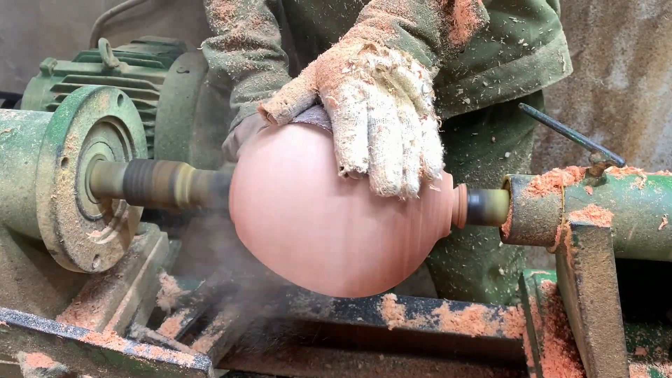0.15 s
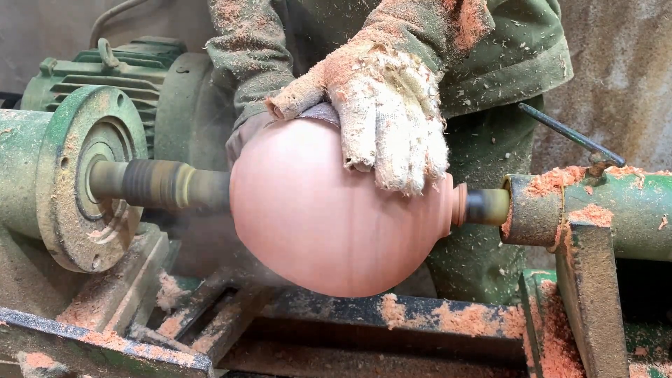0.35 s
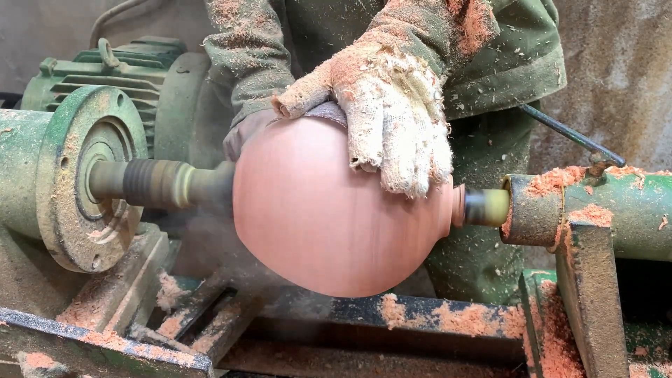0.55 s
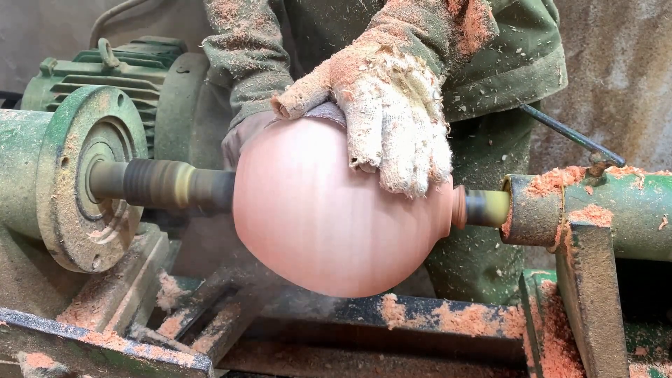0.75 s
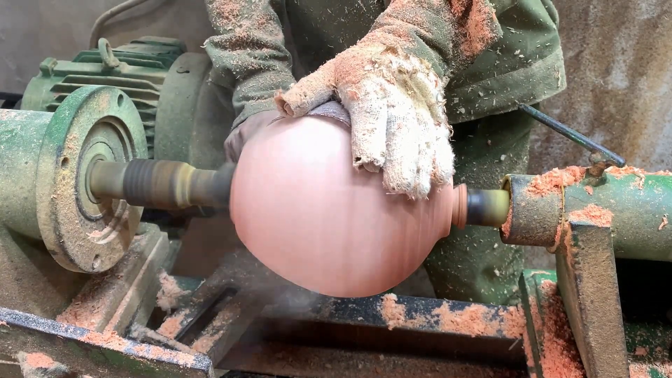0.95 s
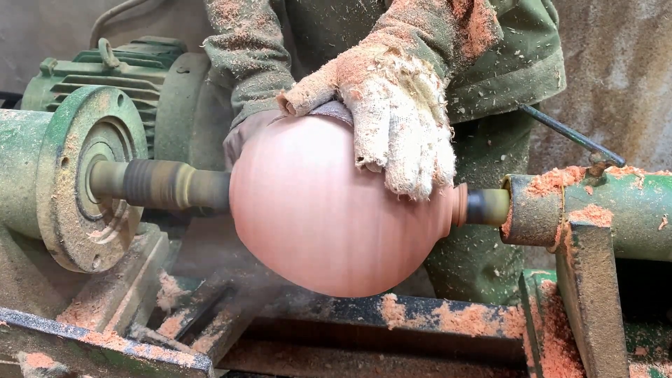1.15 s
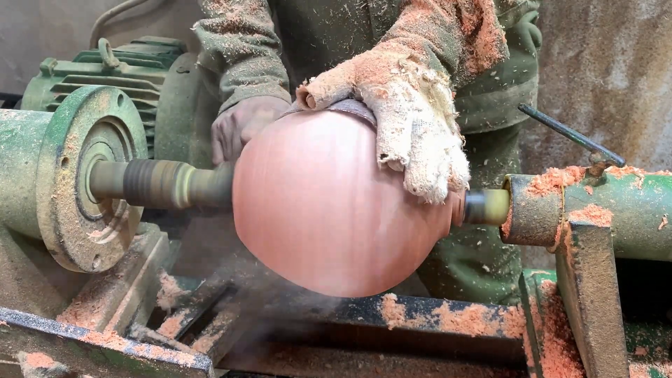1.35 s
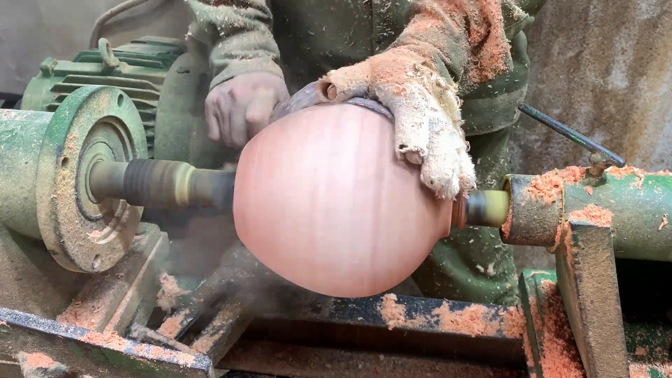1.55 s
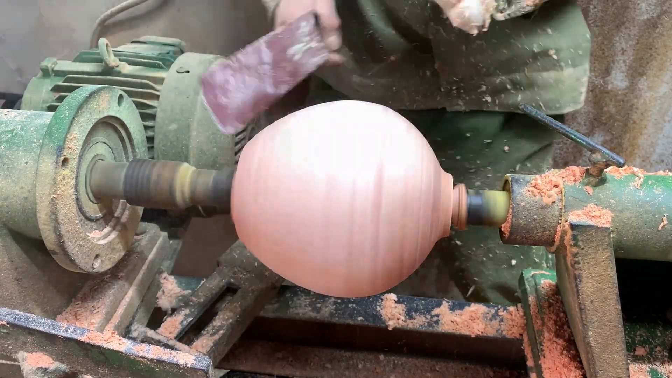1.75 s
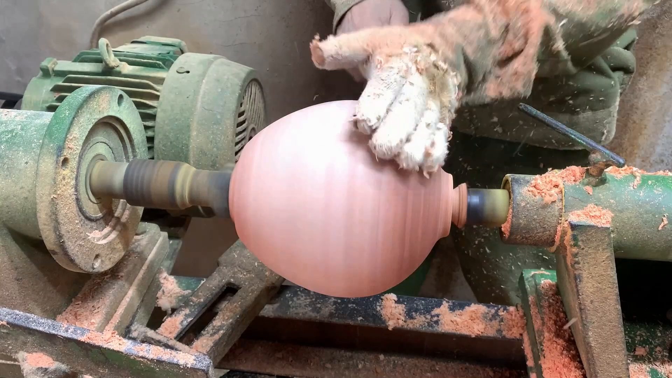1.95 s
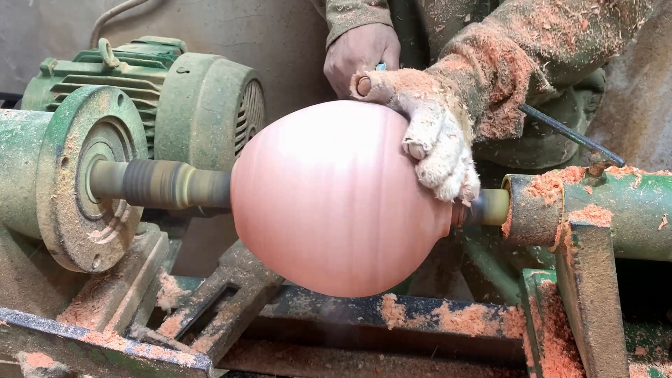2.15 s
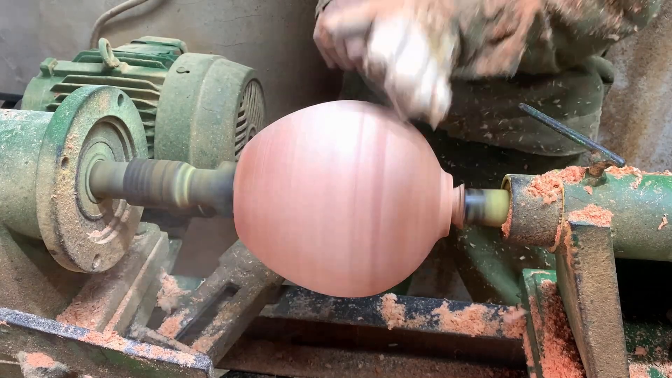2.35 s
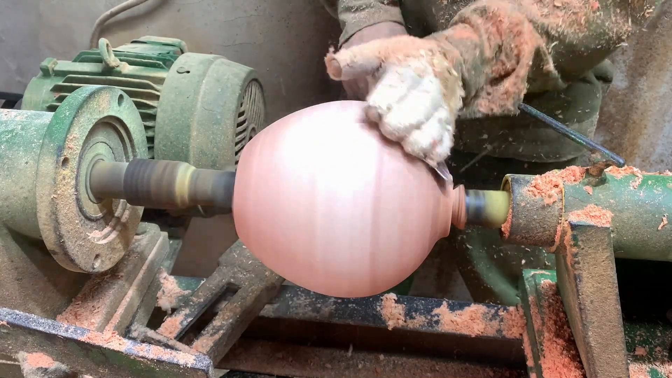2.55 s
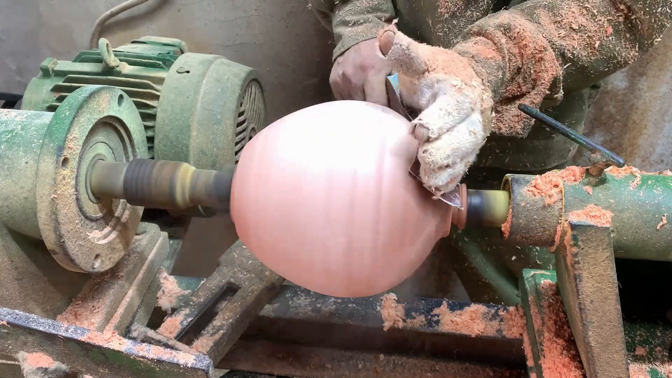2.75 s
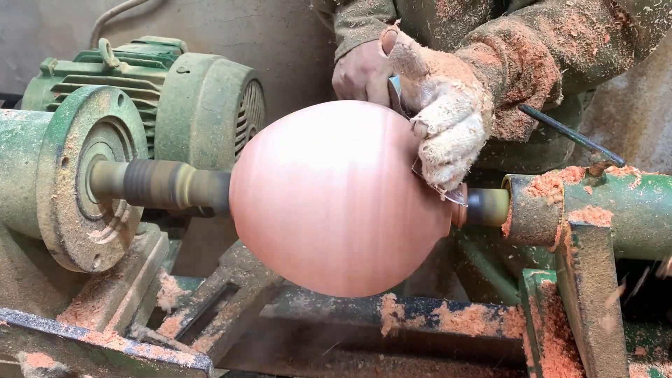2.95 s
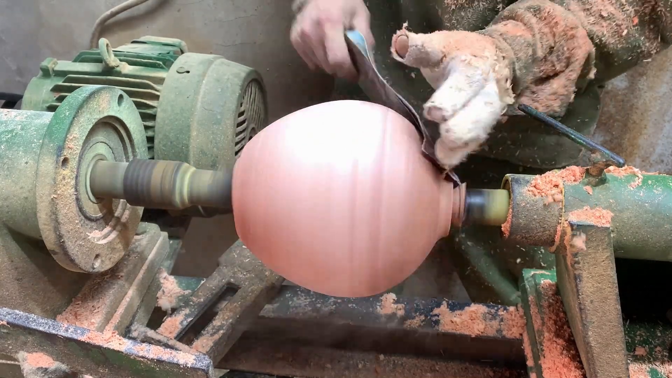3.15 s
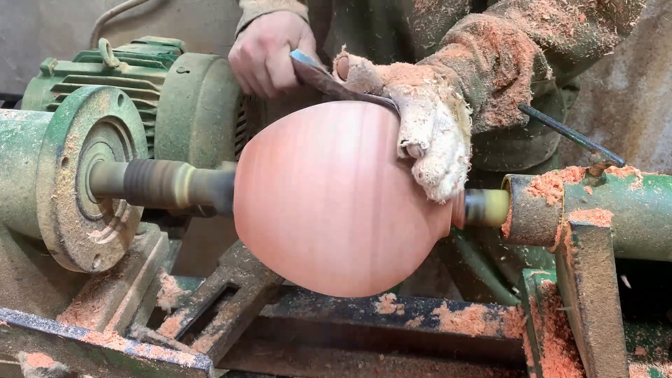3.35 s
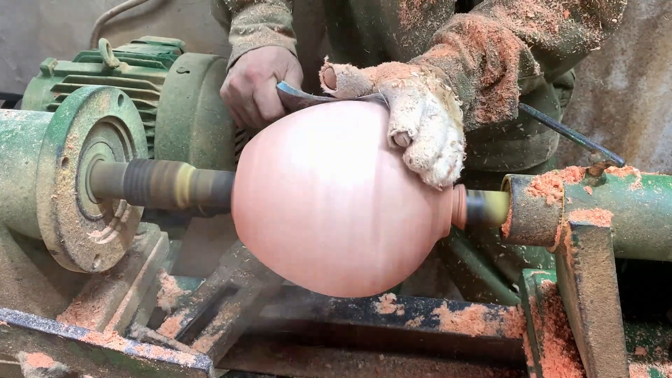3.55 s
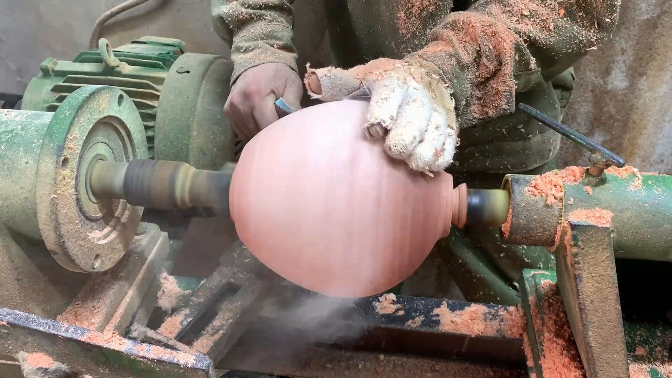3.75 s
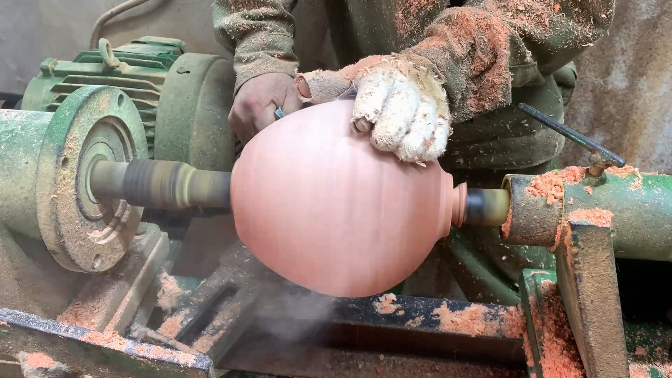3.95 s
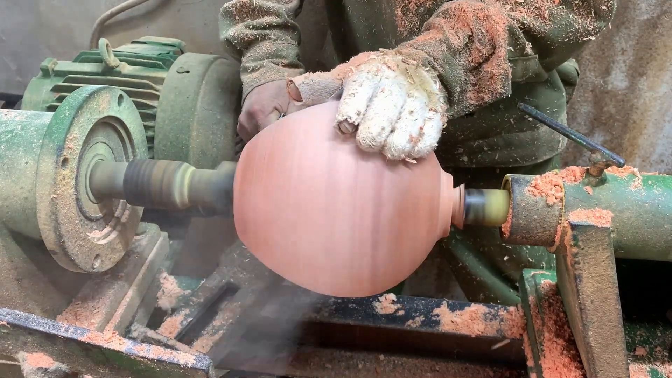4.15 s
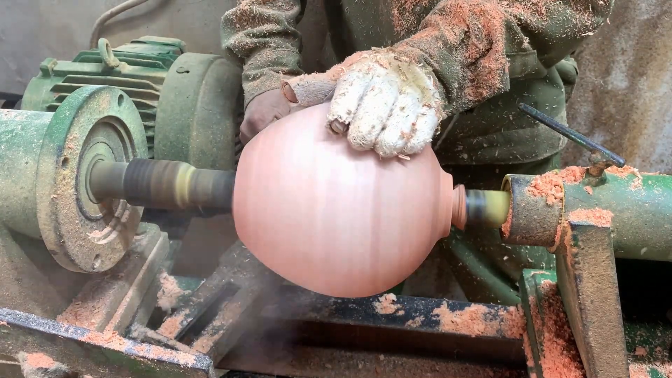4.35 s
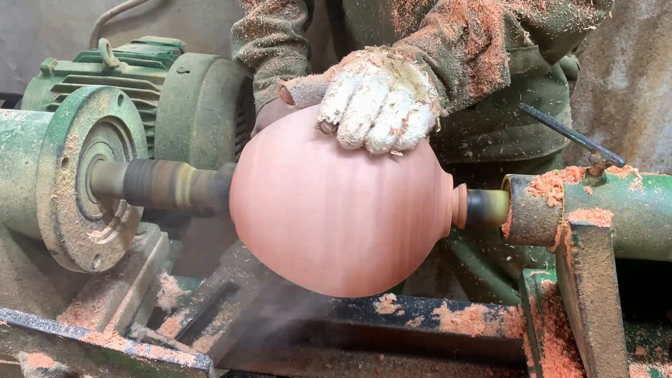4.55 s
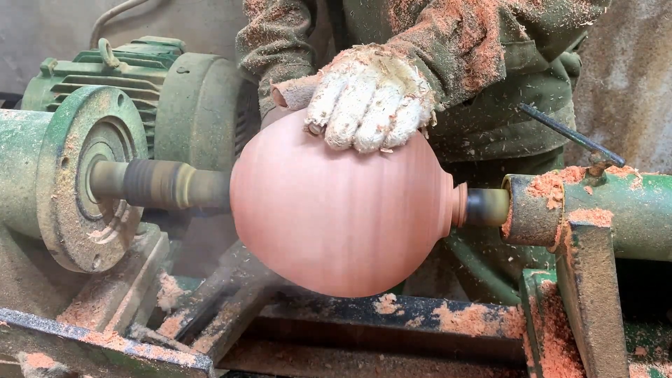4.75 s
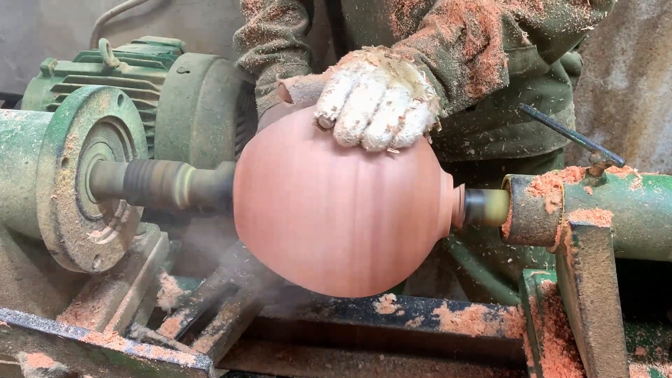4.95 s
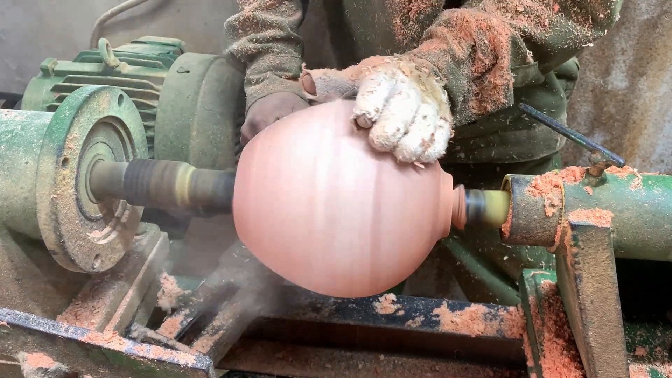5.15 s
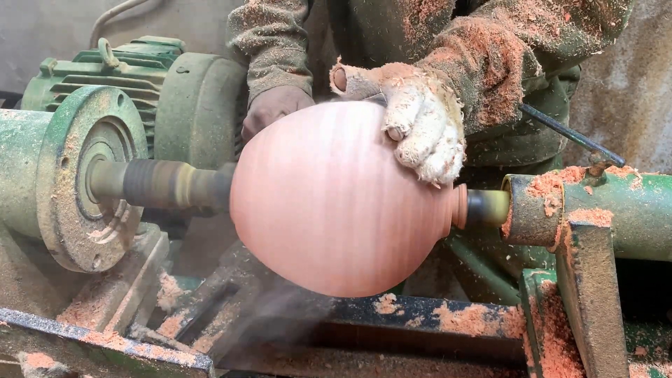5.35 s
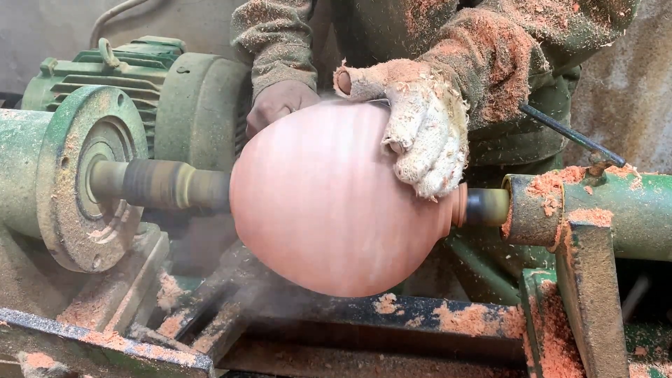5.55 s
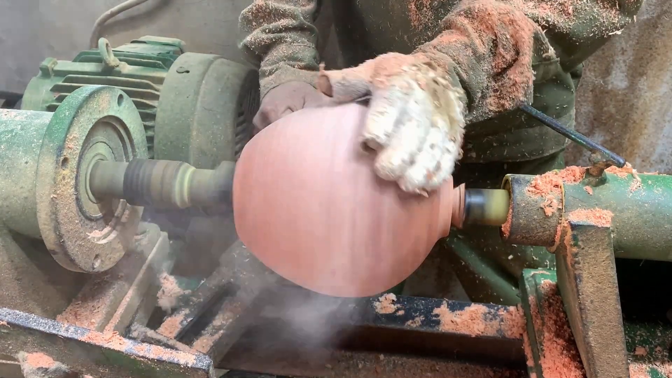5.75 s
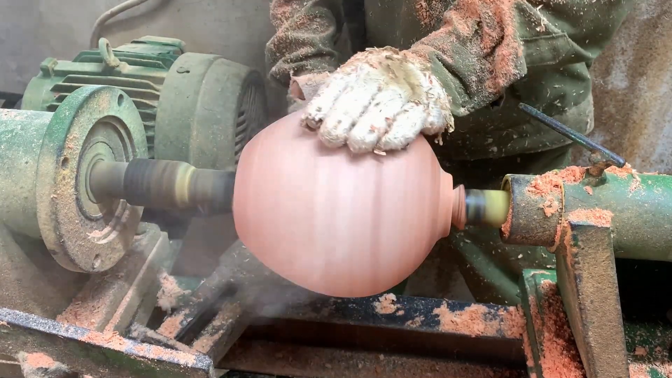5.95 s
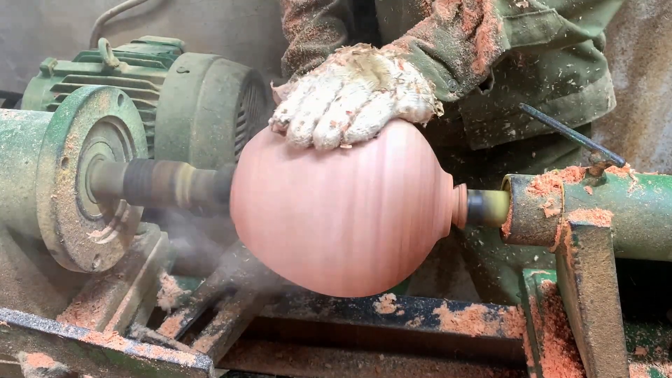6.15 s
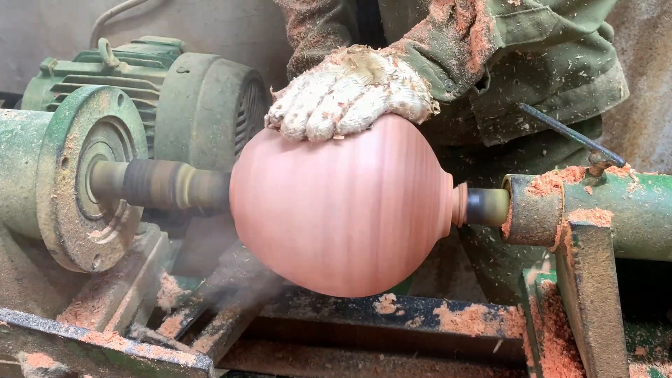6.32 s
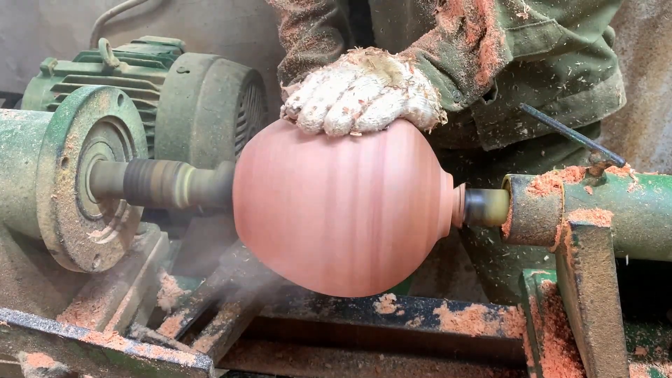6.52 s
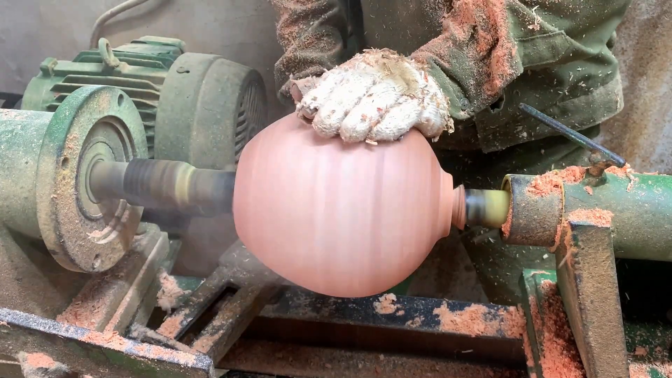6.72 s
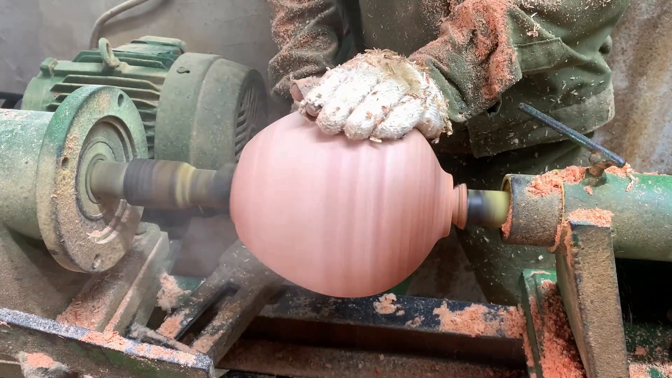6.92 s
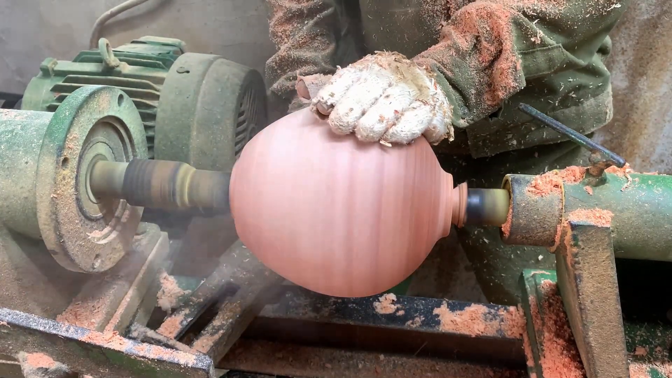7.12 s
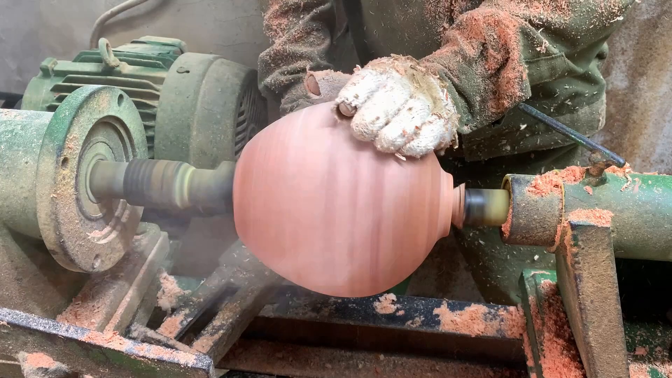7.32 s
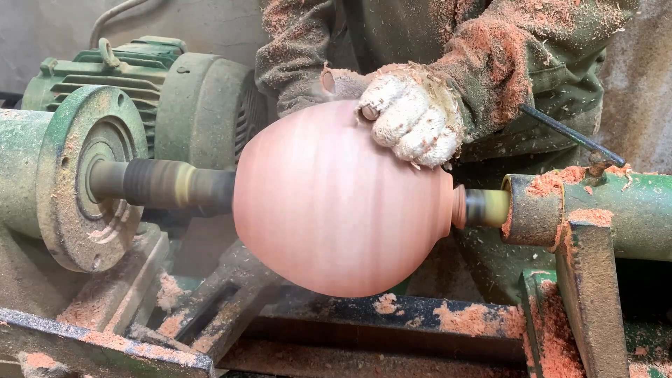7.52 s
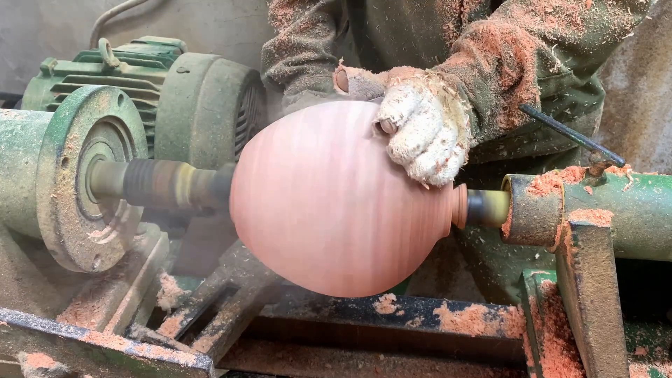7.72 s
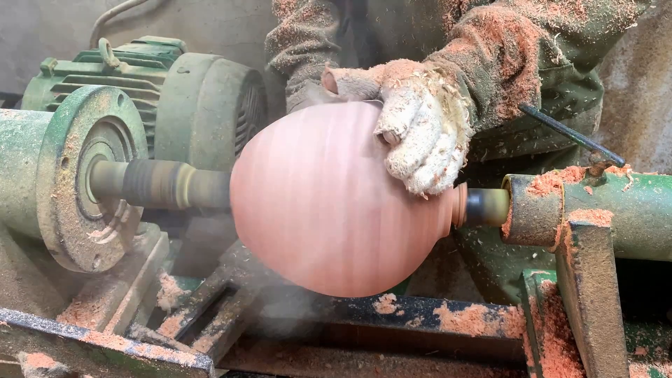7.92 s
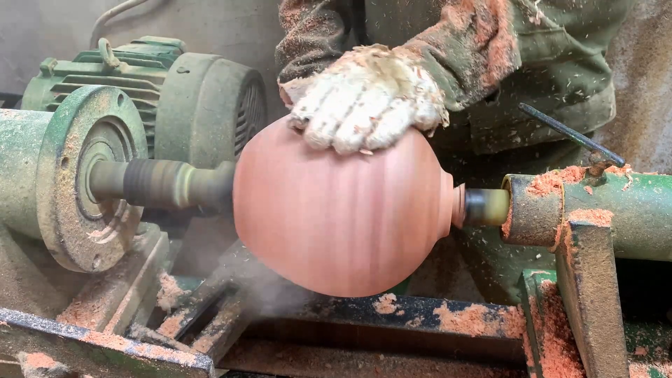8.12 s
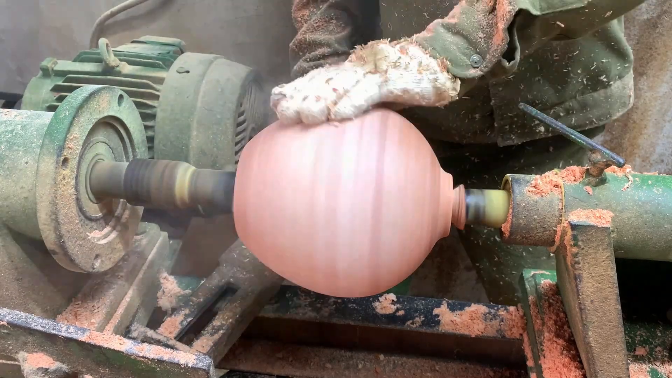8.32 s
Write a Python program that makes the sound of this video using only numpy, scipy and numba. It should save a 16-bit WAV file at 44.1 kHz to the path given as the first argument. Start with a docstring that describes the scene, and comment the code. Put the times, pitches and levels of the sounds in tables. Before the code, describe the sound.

Sandpaper hisses brightly on a spinning wooden vase, fluttering rapidly with each turn, over a low rattling lathe bearing, belt rumble and motor hum.

```python
"""A wooden vase spins on a lathe: a worn bearing rattles the iron headstock over belt rumble and motor hum.
Gritty noise makes the sanding: it opens on the belly under a flat hand, throbbing once a turn on the uneven rim.
A brief fingertip touch and a steadier stroke near the neck follow, with knocks and brushes in between.
A long last stroke then surges and eases as the hand travels back over the belly and onto the crown.
Each grip colours the hiss; a gliding resonance of trapped air and faint echoes finish it."""
import sys
import numpy as np
from scipy import signal
from scipy.fft import rfft, irfft
from scipy.io import wavfile
from scipy.ndimage import uniform_filter1d
from numba import njit

SR = 44100
rng = np.random.default_rng(int(sys.argv[2]) if len(sys.argv) > 2 else 0)


def persist_wave(psi):
    """Save psi, clipped to +-1, as 16-bit WAV."""
    counts = np.round(np.clip(psi, -1, 1) * 32767).astype(np.int16)
    wavfile.write(sys.argv[1], SR, np.atleast_2d(counts).T)


N = 369558
TIME = np.arange(N) / SR
FREQS = np.maximum(np.arange(N // 2 + 1) * SR / N, 1)

# the paper pressed on and lifted, a row per stroke: fully on t/s, starts to lift t/s, attack/s, release/s,
# fine hiss level/dB, coarse rasp level/dB, mid-stroke swell/dB, growth of the rasp/(dB/s)
STROKES = [(0, 1.607, .02, .112, -27.1, -34.9, -1.0, .3), (2.012, 2.3, .047, .128, -33.6, -39.5, -.5, 22),
           (2.57, 3.07, .05, .215, -35.8, -38.6, 3, 4), (3.335, 8.38, .09, .1, -27.7, -33.9, 0, -.05)]


def from_db(db):
    """Decibels to gain."""
    return 10 ** (np.asarray(db) / 20)


def rms_one(x):
    """Scale to unit power."""
    return x / np.sqrt(np.mean(x ** 2) + 1e-20)


def in_time(rows):
    """Each column of a curve at every sample."""
    s, *columns = np.transpose(rows)
    return [np.interp(TIME, s, column) for column in columns]


def over_hz(points):
    """A spectrum table at every frequency, joined along log frequency."""
    hz, db = np.transpose(points)
    return np.interp(np.log(FREQS), np.log(hz), db)


def pan(side_db):
    """Left and right gains for a level difference, left minus right."""
    return from_db(np.array([[.5], [-.5]]) * side_db)


def drift(rate_hz):
    """Smooth random curve of unit power whose movement thins out above `rate_hz`."""
    spectrum = rfft(rng.standard_normal(N))
    return rms_one(irfft(spectrum / (1 + (FREQS / rate_hz) ** 2), N))


def resonate(x, hz, width_hz):
    """Two-pole resonance with gain 1 on top."""
    r = np.exp(-np.pi * width_hz / SR)
    feed = (1 - r * r) / 2 * np.array([1, 0, -1])
    return signal.lfilter(feed, [1, -2 * r * np.cos(2 * np.pi * hz / SR), r * r], x)


def touch(on_s, lift_s, attack_s, release_s, off_db=30):
    """Gain of the paper's contact: it lands, holds and peels away, fastest when it barely touches."""
    # the attack starts and the release ends off_db down; beyond that the gain sinks on to four times off_db
    away = np.maximum((on_s - TIME) / attack_s, 0) + np.maximum((TIME - lift_s) / release_s, 0)
    return from_db(-off_db * np.minimum(away, 2) ** 2)


def drive(rumble_db=-2.5, side_db=-1.0, shared=0.68):
    """Belt, fan and frame rumble as diffuse noise; the motor's wavering hum is partly the same on both sides."""
    # broad rumble: f/Hz, relative spectral level/dB
    rumble_colour = [(20, -1.5), (50, -1), (85, -1.5), (170, -2.5), (320, 0.5), (470, 2.7), (750, -6),
                     (970, -5.5), (1400, -5), (2000, -12.5), (2600, -11.5), (3100, -18), (3650, -18),
                     (4200, -25), (7500, -32), (10000, -39), (15000, -43)]
    # narrow hum resonances: f/Hz, width/Hz, level/dB
    hum_bands = [(97, 9.9, -18), (123.8, 11, -16.5)]
    noise = rfft(rng.standard_normal((2, N)))
    rumble = rms_one(irfft(noise * from_db(over_hz(rumble_colour)), N))
    common = np.sqrt(shared) * rng.standard_normal(N)
    shake = common + np.sqrt(1 - shared) * rng.standard_normal((2, N))
    hum = sum(from_db(db) * rms_one(resonate(shake, hz, width)) for hz, width, db in hum_bands)
    return (from_db(rumble_db) * rumble + hum) * pan(side_db)


def bearing(turn, rough_db=1.27, level_db=-.8):
    """Balls grind in their race, harder at every beat of shaft and cage, and set the headstock ringing."""
    # headstock resonances: f/Hz, half the width of each filter pass/Hz, relative level/dB, left minus right/dB
    headstock_modes = [(589, 63, -2, -1.5), (669, 51.4, -1.8, -2.5), (815, 70, -4.2, -1),
                       (1172, 104, -13, 10.5), (1400, 60, -22, 8)]
    # beats of shaft, cage and balls: rate/(times per turn), depth/dB
    bearing_beats = [(.608, 1.35), (1, 1.25), (1.391, .5), (2, 2.6), (2.867, 1.5), (4.867, 1.7)]
    tight_turn = 4.81   # turn at which all the beats fall together
    lean_db, growth_db_per_s = 1.0, .22   # harder under the hand, and as the work goes on
    load_db = sum(depth * np.cos(2 * np.pi * order * (turn - tight_turn)) for order, depth in bearing_beats)
    grind = rng.standard_normal((2, N)) * from_db(load_db + rough_db * drift(150))
    rings = np.zeros((2, N))
    for k, (hz, half_width, db, side_db) in enumerate(headstock_modes):
        ring = resonate(resonate(grind, hz, 2 * half_width), hz, 2 * half_width)
        rings += from_db(db) * pan(side_db) * rms_one(ring) * (-1) ** k   # neighbours in opposite phase
    leaning = sum(touch(*row[:4]) for row in STROKES)
    return from_db(level_db + lean_db * leaning + growth_db_per_s * TIME) * rms_one(rings)


def handling():
    """Each knock or brush of hand and paper is a noise burst that dies quickly in one broad resonance."""
    # t/s, starting level/dB, f/Hz, width/Hz, time to fall 60 dB/s
    hand_noises = [(1.83, -55.5, 8000, 7000, 0.21), (2.335, -41, 2200, 1500, .08),
                   (2.507, -55, 8000, 7000, .07), (3.269, -31, 40, 170, .12), (3.355, -30, 3150, 1200, .06)]
    out, noise = np.zeros((2, N)), rng.standard_normal((2, N))
    for s, db, hz, width, t60 in hand_noises:
        fade = (TIME >= s) * from_db(db - 60 * np.clip((TIME - s) / t60, 0, 2))
        out += fade * rms_one(resonate(noise, hz, width))
    return out


def grit(per_s, spread_db):
    """Spectrum of countless grains tearing fibres: clicks of random size, scattered differently to each side."""
    sizes = from_db(spread_db * rng.standard_normal((2, N))) * rng.standard_normal((2, N))
    lands = rng.random((2, N)) < per_s / SR
    return rfft(sizes * lands)


def contact(turn, runout_db, catch_db, flutter_db):
    """Pressure follows the out-of-round rim once a turn; the paper also catches and flutters at random."""
    # the wood falls away quickly at its low side and comes back slowly: share of a turn, height 0-1
    rim_profile = [(.02, 0.59), (.23, 1), (.38, 0.26), (.5, 0.11), (.65, 0.15), (.83, 0.6)]
    share, height = np.transpose(rim_profile)
    rim = np.interp(turn, share, height, period=1)
    return rms_one(from_db(runout_db * rim + catch_db * drift(530) + flutter_db * drift(34)))


def travel():
    """Changes of hiss and rasp (dB) as the hand presses harder and softer on its way along the vase."""
    # hand pressure, of which only the swing about its mean counts: t/s, level/dB
    hand_pressure = [(3.42, -31), (5.59, -29), (6.28, -32), (7.16, -31), (7.55, -28), (7.8, -32),
                     (8.05, -30), (8.23, -31), (8.38, -38)]
    rasp_follows = .2   # share of the swing that reaches the coarse rasp
    crown_s, slide_s, crown_rasp_db = 5.85, .2, -2.8   # the paper rasps less on the crown
    pressure_db, = in_time(hand_pressure)
    swing_db = pressure_db - pressure_db.mean()
    on_crown = np.clip((TIME - crown_s) / slide_s, 0, 1)
    return swing_db, rasp_follows * swing_db + crown_rasp_db * on_crown


def stroke(grains, row, colour, changes=(0, 0), split_hz=7000, skirt_hz=1700):
    """One stroke: the grip colours the grains, the level bends mid-stroke and the rasp drifts against the hiss."""
    # where the hiss is heard: f/Hz, left minus right/dB
    hiss_side = [(2000, 1.5), (4100, -2.5), (4900, -3), (6000, -4.5), (7600, 0.1), (12000, 0)]
    on_s, lift_s, attack_s, release_s, hiss_db, rasp_db, swell_db, growth = row
    skirt = 1 / np.sqrt(1 + (skirt_hz / FREQS) ** 6)   # thins the lows
    coloured = grains * from_db(over_hz(colour)) * skirt * pan(over_hz(hiss_side))
    fine_share = 1 / (1 + (split_hz / FREQS) ** 20)
    fine = irfft(coloured * fine_share, N)
    coarse = irfft(coloured * (1 - fine_share), N)
    from_middle_s = np.clip(TIME, on_s, lift_s) - (on_s + lift_s) / 2
    swell = from_db(swell_db * np.cos(np.pi * from_middle_s / (lift_s - on_s)))
    envelope = touch(on_s, lift_s, attack_s, release_s) * swell
    hiss = from_db(hiss_db + changes[0]) * rms_one(fine)
    rasp = from_db(rasp_db + growth * from_middle_s + changes[1]) * rms_one(coarse)
    return envelope * (hiss + rasp)


@njit
def gliding_resonance(x, angle, r):
    """Two-pole resonance whose centre (radians a sample) moves; gain 1 on top."""
    y = np.zeros_like(x)
    for i in range(2, len(x)):
        y[i] = (1 - r * r) / 2 * (x[i] - x[i - 2]) + 2 * r * np.cos(angle[i]) * y[i - 1] - r * r * y[i - 2]
    return y


def pocket(hiss, width_hz=1300):
    """The wedge of air between paper and wood lifts one gliding band, most while the hand rests."""
    # centre of the air pocket under the flat hand: t/s, f/Hz
    pocket_path = [(0, 4100), (1.15, 3900), (1.6, 6000), (3.4, 6300), (4.5, 9100), (5.2, 9300), (5.6, 8000),
                   (6.3, 7960), (6.55, 11900), (7.65, 12100), (8.2, 8300)]
    steady_lift_db, blur_octaves_per_s = 2.5, 1.2   # lift under a steady hand; glide that halves it
    hz, = in_time(pocket_path)
    glide = uniform_filter1d(np.abs(np.gradient(np.log2(hz))) * SR, size=4096)   # octaves per s
    lift_db = steady_lift_db / (1 + (glide / blur_octaves_per_s) ** 2)
    angle, r = 2 * np.pi * hz / SR, np.exp(-np.pi * width_hz / SR)
    ring = np.array([gliding_resonance(side, angle, r) for side in hiss])
    return hiss + (from_db(lift_db) - 1) * ring


def scatter(hiss, echo_db=-22, nearest_s=0.001002, farthest_s=.007, count=9):
    """Bed, motor and sleeve throw back many faint echoes, whose paths sway as the hand wanders."""
    out, wander = hiss.copy(), drift(.6)
    for side in range(2):
        paths_s = rng.uniform(nearest_s, farthest_s, count)   # before the sway
        sways = rng.normal(0, 0.018, count)   # share of each path
        for k, (path_s, sway) in enumerate(zip(paths_s, sways)):
            heard_from = TIME - path_s * (1 + sway * wander)
            out[side] += from_db(echo_db) * (-1) ** k * np.interp(heard_from, TIME, hiss[side])
    return out


def sanding(turn):
    """The flat hand on the wide belly throbs strongly; fingertips near the narrow neck ride more evenly."""
    # colour of the paper in each grip: f/Hz, relative spectral level/dB
    palm_colour = [(2000, -20), (2800, -15), (4100, -10), (4800, -10), (6000, -9.5), (7500, -5.5),
                   (8800, -2), (12000, -3), (13500, -5), (15500, -11.5)]
    touch_colour = [(2000, -22), (3400, -19), (4600, -14), (6300, -12), (8800, -5), (11000, -6.5),
                    (13000, -11), (15500, -14)]
    neck_colour = [(2000, -19), (3400, -13.5), (4700, -5.3), (6300, -2), (7500, -2), (8300, 0.5),
                   (9700, -2.5), (11000, -0.5), (13000, -3), (15500, -9)]
    sweep_colour = [(2000, -17.5), (2750, -13.5), (4200, -10), (5400, -7.5), (7000, -3), (8800, 0.5),
                    (11500, 0), (13500, -3), (15500, -9.5)]
    grains = grit(per_s=36000, spread_db=1.0)
    palm, light_touch, on_neck, sweep = STROKES
    belly = stroke(grains, palm, palm_colour) + stroke(grains, sweep, sweep_colour, travel())
    neck = stroke(grains, light_touch, touch_colour) + stroke(grains, on_neck, neck_colour)
    belly_hiss = pocket(belly) * contact(turn, runout_db=5.0, catch_db=1.09, flutter_db=0.55)
    neck_hiss = neck * contact(turn, runout_db=2.5, catch_db=.85, flutter_db=.7)
    return scatter(belly_hiss + neck_hiss)


def scene():
    """Paper and machine share the turning of the spindle."""
    # spindle, a little faster between the two long strokes: t/s, speed/(turns per s)
    spindle_speed = [(0, 23.82), (1.6, 23.84), (2.0, 23.97), (3.3, 23.93), (4.6, 23.85), (5.2, 23.72),
                     (6.0, 23.8), (8.4, 23.71)]
    # loudness of the machine, applied to bearing and drive together: t/s, level/dB
    lathe_level = [(0, -42.3), (1.6, -42.6), (3.1, -39.8), (8.38, -40)]
    turn = np.cumsum(in_time(spindle_speed)[0]) / SR
    machine = from_db(in_time(lathe_level)[0]) * (drive() + bearing(turn))
    return machine + handling() + sanding(turn)


def record(dry):
    """The top is cut steeply by an elliptic low-pass."""
    cutoff_hz, ripple_db, stop_db = 15800, .1, 90
    return signal.sosfilt(signal.ellip(14, ripple_db, stop_db, cutoff_hz, fs=SR, output="sos"), dry)


dry = scene()
out = record(dry)
persist_wave(out)
```